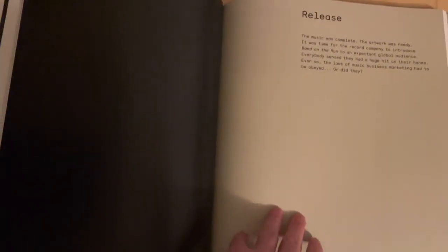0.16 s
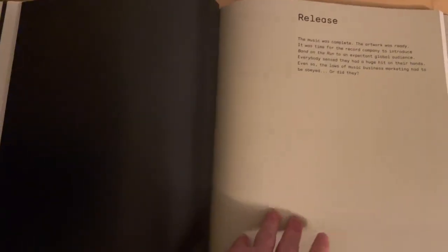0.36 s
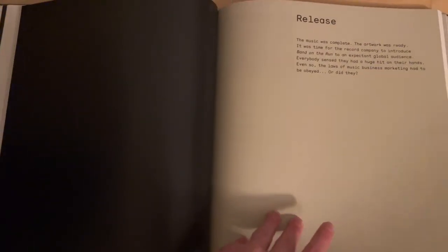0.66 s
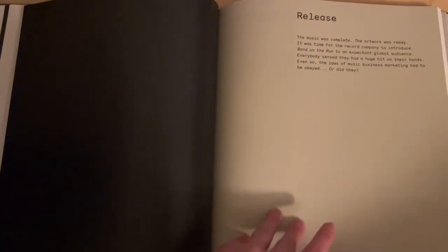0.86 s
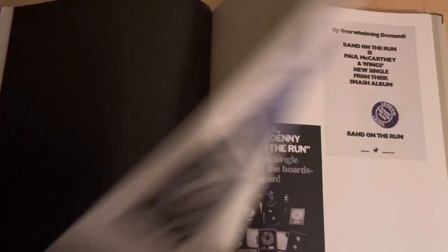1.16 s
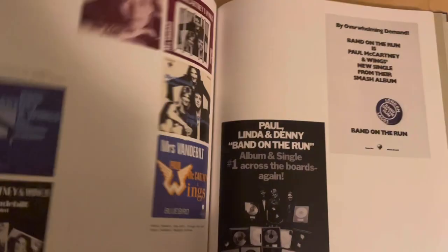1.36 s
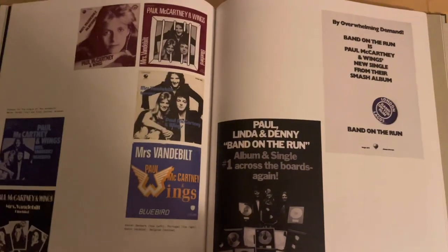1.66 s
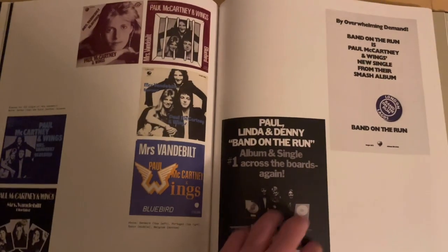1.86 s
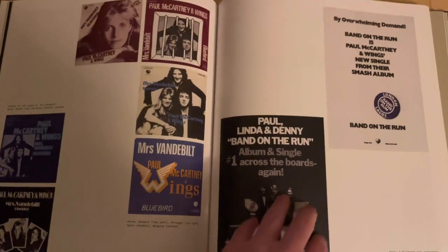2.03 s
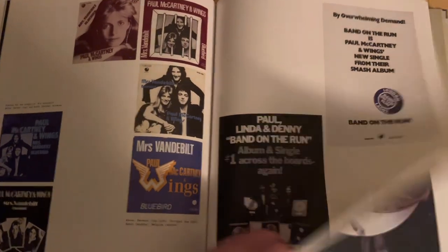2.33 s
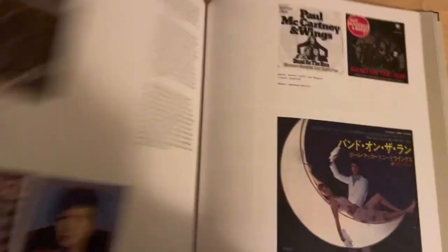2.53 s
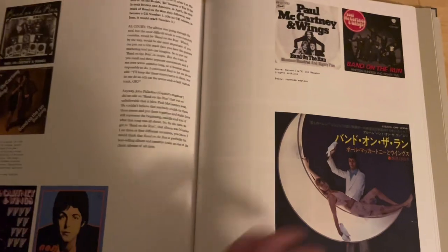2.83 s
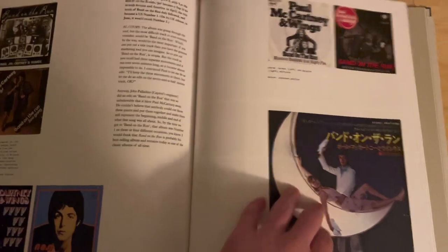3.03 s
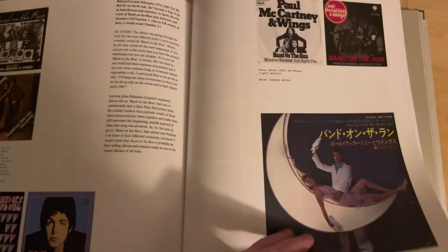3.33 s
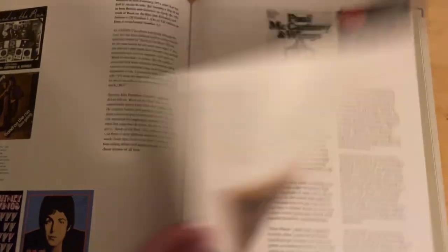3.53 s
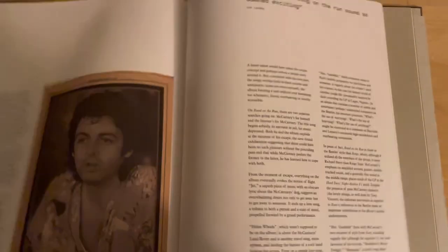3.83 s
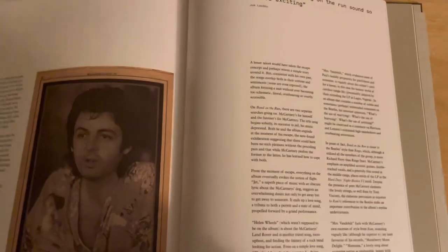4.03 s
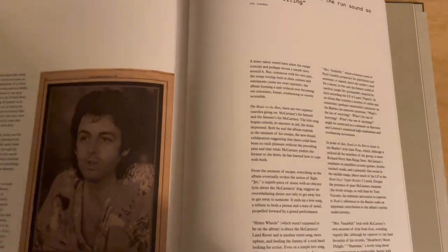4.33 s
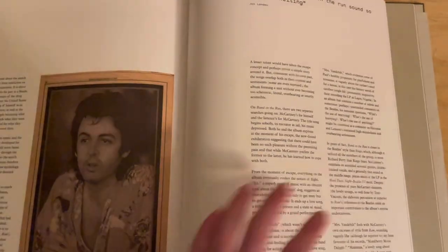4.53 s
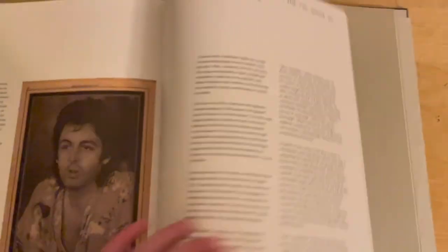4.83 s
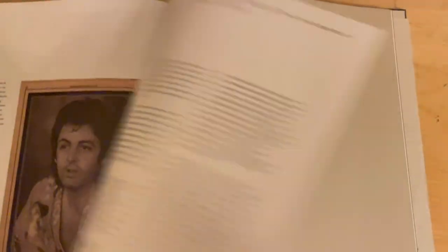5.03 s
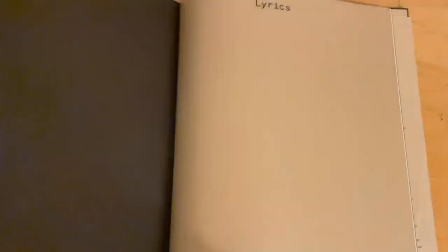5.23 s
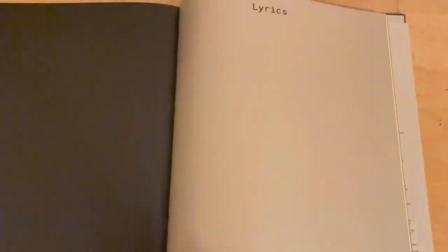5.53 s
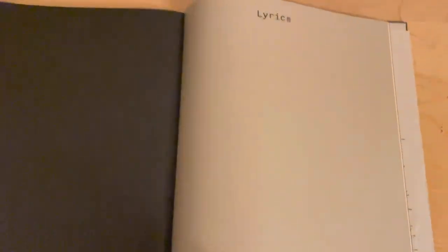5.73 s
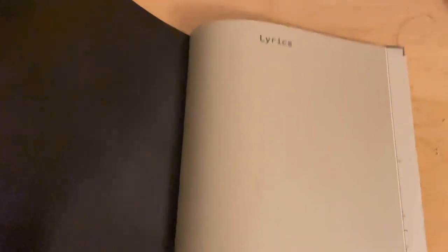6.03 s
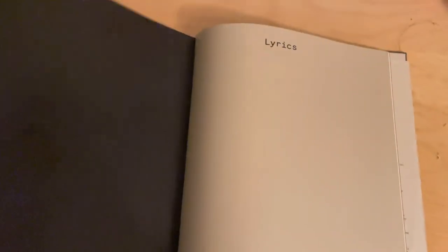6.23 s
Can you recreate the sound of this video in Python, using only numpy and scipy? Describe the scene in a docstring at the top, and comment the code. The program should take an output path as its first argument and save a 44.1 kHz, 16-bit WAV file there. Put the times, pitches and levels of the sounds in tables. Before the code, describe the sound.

Close up in a small quiet room, heavy pages of a big book are turned. Faint finger rubs lead to a light flick, then a rustling flap, a sharp paper pop and another flap. After more sliding, the hardest slap lands near the middle. A brisk dry swipe follows, then a softer, duller page landing and a last small cluster of flaps. The stereo pickup is near, with a very short room tail and faint hush.

```python
"""In a small, quiet room, the stiff pages of a large hardcover book are turned one after another, close by.
Fingers and sheets slide with a dry hiss of coloured, grainy noise; swinging sheets rustle and fan low puffs.
A lifted sheet buckles with a snap of decaying partials, its edge ticks in bright bursts of tiny contacts,
and it flaps down on the stack as a slap through the sheet's resonances, with a crisp crinkle on top.
Gaps of air sing under the sheets, dull thumps settle them, and a faint hush lies beneath."""
import sys
import numpy as np
from scipy import signal
from scipy.fft import rfft, irfft, next_fast_len
from scipy.io import wavfile
from scipy.ndimage import uniform_filter1d, map_coordinates

SR = 44100
rng = np.random.default_rng(int(sys.argv[2]) if len(sys.argv) > 2 else 0)


def output_pcm(signal):
    """Save a mono or channel-first signal as 16-bit PCM at the path in sys.argv[1].

    Samples are clipped to [-1, 1] before scaling.
    """
    pcm = np.clip(np.atleast_2d(signal).T, -1, 1) * 32767
    wavfile.write(sys.argv[1], SR, np.round(pcm).astype(np.int16))


N = 281358

# Event levels and shares are relative: each source trims them, and the stereo placement follows.
# a sheet flexes or lands: [t/s, level/dB, crisp share/dB, softness cut-off f/Hz, slap rise/s, slap t60/s]
FLAP_EVENTS = [(0.084, -53.5, -35, 1267, 0.0049, 0.033), (0.288, -48.5, -6.5, 1450, 0.0022, 0.081),
               (.494, -53.5, -29, 1270, 0.0023, 0.036), (0.588, -40.5, -44, 1040, 0.011, 0.049),
               (0.673, -43, -8, 900, 0.0017, 0.028), (.682, -30.5, -2.5, 1340, 0.00091, 0.025),
               (.718, -35.5, -11.5, 1210, 0.0015, 0.043), (1.4717, -32.5, -15, 1600, 0.002, 0.061),
               (1.4914, -19.5, -22, 1250, 0.0021, 0.019), (1.499, -25.5, -16, 2010, 0.0017, 0.045),
               (1.504, -21, -14, 2090, .0008, 0.028), (1.5112, -25, -21, 1590, 0.0007, 0.043),
               (1.521, -33, -25, 800, 0.0042, 0.054), (2.479, -35.5, -22, 1430, 0.0013, 0.02),
               (2.5141, -19, -7.5, 1130, 0.00065, 0.017), (2.528, -32, -25.5, 1030, 0.0043, 0.14),
               (2.559, -26, -23, 1030, 0.0097, 0.066), (2.577, -31, -9.5, 1303, 0.0042, 0.056),
               (2.59, -28, -28, 990, 0.0058, 0.051), (2.671, -40, -19.5, 1590, 0.0021, 0.096),
               (3.024, -50.5, -1, 1030, 0.0027, 0.046), (3.221, -35.5, -4, 1520, 0.0043, 0.047),
               (3.537, -39.5, -10, 1800, 0.0013, 0.031), (3.674, -22, -27, 1080, 0.0044, 0.028),
               (3.706, -42, -22, 1000, 0.0043, 0.045), (3.7925, -9.5, -12.5, 1170, 0.0018, 0.025),
               (3.803, -16, -8, 1360, 0.0059, 0.047), (3.812, -17.5, -15, 1310, 0.0022, 0.083),
               (3.829, -29, -12, 1090, 0.0031, 0.11), (3.864, -41, -8, 1500, 0.0013, 0.057),
               (4.273, -43, 0.5, 2020, 0.0031, 0.046), (5.061, -39.5, -3.5, 2375, 0.0042, 0.024),
               (5.195, -42.5, -9.5, 800, 0.0046, 0.042), (5.21, -34, -45, 450, 0.0044, 0.046),
               (5.236, -29, -44, 780, 0.0023, 0.035), (5.26, -19.5, -40, 800, 0.0044, 0.037),
               (5.268, -33.5, -12, 2200, .001, 0.023), (5.2705, -14.5, -36, 1292, 0.0022, 0.029),
               (5.283, -27, -31.5, 1280, 0.0048, 0.076), (5.3146, -16, -37, 1357, 0.0011, 0.019),
               (5.318, -25, -19, 2100, 0.001, .04), (5.329, -42, -22, 2097, 0.0027, 0.2),
               (5.423, -28.5, -33, 1050, 0.0012, 0.01), (5.433, -49.5, -22, 1680, 0.0031, 0.09),
               (5.8156, -35, -12.5, 1460, 0.0012, 0.031), (5.852, -40.5, -12, 1480, 0.0014, 0.031),
               (5.878, -37.5, -14, 1447, 0.0017, 0.028), (5.924, -35, -15, 1230, 0.002, 0.048),
               (6.04, -40, -19, 1400, 0.00096, 0.025), (6.053, -34, -20, 1700, 0.001, 0.021),
               (6.066, -31, -19, 1380, 0.00063, 0.021), (6.079, -32, -16, 1540, 0.004, 0.048),
               (6.113, -28, -16, 1620, 0.0031, 0.05), (6.119, -18.5, -18.5, 1560, 0.0029, 0.033),
               (6.141, -15, -15, 1760, 0.0013, 0.018), (6.155, -35, -23, 1500, 0.003, 0.076),
               (6.259, -41, -25, 1140, 0.0025, 0.029), (6.334, -40.5, -10, 1090, 0.0023, 0.019),
               (6.359, -25, -45, 1220, 0.0073, 0.044)]
# a page edge slips off a finger or another page: [t/s, level/dB, body share/dB]
TICK_EVENTS = [(0.6705, -41.5, 1.5), (0.6816, -33, -27), (0.7163, -33, -2), (0.849, -46, 6),
               (0.8773, -50, 11.5), (0.899, -39, 5), (1.1355, -37, 4), (1.4272, -42, -33),
               (1.485, -29.5, -8.5), (1.535, -37, -10.5), (1.627, -47.5, -12), (1.695, -38, 3.5),
               (1.71, -33.5, 3.5), (2.28, -37, -17), (2.5158, -34, 5), (2.749, -49, -8.5),
               (3.606, -47.5, -0.5), (3.654, -42, 0), (3.792, -28, 5.5), (4.169, -49.5, 6.5),
               (4.72, -47.5, -9), (4.819, -58, 6.5), (5.407, -59, -6), (6.357, -36.5, -5.5)]
# a sheet's weight settles on the stack: [t/s, level/dB]
THUMP_EVENTS = [(.748, -48.5), (1.513, -41.5), (1.716, -48.5), (2.485, -49), (2.516, -43), (2.56, -43.5),
                (3.676, -44), (3.795, -43.5), (3.824, -44.5), (5.208, -44.5), (5.272, -40.5),
                (5.319, -40.5), (5.428, -54.5), (5.935, -54), (6.15, -41)]
# a bent sheet pops through: [t/s, level/dB, pitch f/Hz, swell/s, t60/s, crack share/dB, left over right/dB]
BUCKLE_EVENTS = [(1.2026, -36.5, 1482, 0.0061, 0.02, -1.5, -0.5),
                 (2.1784, -13, 2257, 0.0019, 0.013, -6, 0.5), (3.2251, -27, 1795, 0.0015, 0.019, -21, -1)]
# air sings in the gap under a sheet, and one row (near 1.19 s) is the rising chirp of a bending sheet: [middle
# t/s, length/s, level/dB, start f/Hz, end f/Hz]
GAP_NOTES = [(0.602, .04, -52, 622, 440), (.695, .05, -51, 548, 474), (1.194, .03, -41, 713, 1054),
             (1.39, 0.088, -62.5, 329, 422), (1.647, .06, -57.5, 559, 449), (2.61, 0.17, -45.5, 541.8, 467),
             (2.713, 0.24, -59.5, 980, 1102), (3.549, .04, -56, 1002, 420),
             (3.682, 0.027, -39, 312.5, 225.8), (3.814, .058, -38.5, 397.6, 311),
             (4.282, 0.068, -54, 985, 787), (4.734, .045, -64, 721, 381), (4.936, .26, -65.5, 884, 585.5),
             (5.278, .04, -31, 669, 557.5)]
# a finger or sheet slides over paper:
# [start t/s, rise/s, hold/s, hiss level/dB, edge sizzle share/dB, hollow rustle share/dB]
SLIDE_STROKES = [(0, 0.0027, 0.041, -84, 3, 5.5), (0.275, 0.01, 0.0098, -80, -3, 6),
                 (0.661, 0.024, 0.043, -60.5, -13.5, -3), (0.874, 0.12, 0.0038, -61.5, -2.5, 1.5),
                 (1.016, 0.15, 0.056, -62, -7, 3.5), (1.25, 0.042, 0.36, -74.5, -0.5, 4),
                 (1.46, 0.0081, 0.017, -56, -0.5, 3), (1.512, 0.021, 0.049, -59.5, -3.5, -8),
                 (1.706, 0.014, 0.021, -57.5, -2, -8), (1.784, 0.043, 0.12, -67.5, -8.5, -4),
                 (2.037, 0.052, 0.23, -66, -6, -4), (2.326, 0.11, 0.032, -59.5, -9, -13),
                 (2.497, 0.018, 0.034, -53, -8, -0.5), (2.623, 0.12, 0.055, -59, -8, -10.5),
                 (2.985, 0.044, 0.012, -63.5, -6.5, -10), (3.053, 0.17, 0.024, -62.5, -4, -19),
                 (3.332, 0.068, 0.021, -59, -6, -10), (3.447, 0.092, 0.011, -57.5, -3.5, -5.5),
                 (3.566, 0.11, 0.05, -56.5, -3, -1), (3.817, 0.026, 0.017, -54.5, -6.5, -4),
                 (3.912, 0.052, 0.092, -65.5, -11.5, 0.5), (4.081, 0.088, 0.14, -67, -5.5, 0.5),
                 (4.346, 0.0273, 0.0084, -72.5, -6.5, -13.5), (4.583, 0.033, 0.027, -56, -1, -16.5),
                 (4.627, 0.04, 0.0074, -49, -0.5, -18), (4.678, 0.0095, 0.011, -59.5, -6, -16),
                 (4.802, 0.022, 0.03, -75, -11, 3), (4.88, 0.025, .06, -73.5, -18.5, 2),
                 (4.996, 0.058, 0.049, -69, -2.5, 5), (5.168, 0.11, 0.023, -73.5, 4.5, 1),
                 (5.803, 0.02, 0.054, -83.5, 3, 10), (6.07, 0.084, 0.055, -77.5, -15, 16),
                 (6.235, 0.19, .04, -64, -35, 2.5)]
# a sheet swings and fans air: [start t/s, rise/s, puff level/dB, hollow rustle level/dB]
SHEET_SWINGS = [(0.289, 0.013, -64.5, -85), (0.592, 0.015, -54, -72), (.67, 0.06, -53, -63),
                (.87, 0.032, -53.5, -71), (1.13, 0.15, -63, -77), (1.48, 0.03, -51, -54),
                (1.69, 0.037, -51.5, -56.5), (2.169, 0.016, -51.5, -44), (2.279, 0.021, -54, -90),
                (2.51, 0.07, -48.5, -47), (3.013, 0.022, -53, -66), (3.22, 0.017, -54.5, -54),
                (3.538, 0.02, -51, -62.5), (3.665, 0.04, -55, -52.5), (3.788, 0.022, -49, -39),
                (4.27, 0.065, -65.5, -74.5), (5.05, 0.025, -57.5, -77), (5.2, 0.115, -48, -59.5),
                (5.81, 0.057, -58.5, -68), (6.06, 0.099, -48, -51), (6.33, 0.049, -46, -76)]

# resonances of a sheet over the stack, before each bend varies them: [f/Hz, width/Hz, level/dB]
SHEET_MODES = [(331, 61, -3), (429.5, 12, 5.5), (526, 82, 8), (630, 190, 4.5), (776, 24, 0.5),
               (847, 38, -2.5), (980, 140, -1), (1390, 97, 0), (1650, 30, -13), (2600, 180, -13)]
# partials of a buckle's ring, before the crack tilts them: [multiple of its pitch, level/dB]
BUCKLE_PARTIALS = [(0.641, -11), (.75, -14.5), (0.928, -7), (1, -4.5), (1.183, -6), (1.36, -16), (2.14, -5),
                   (2.419, -16.5), (2.83, -11)]

# broad hiss of paper fibres: [f/Hz, level/dB]
HISS_SPECTRUM = [(200, -28), (700, -9), (1500, 1.5), (3000, 6.5), (5000, 3.5), (7000, -5.5), (10000, -17.5),
                 (16000, -41)]
# fine sizzle of a sliding page edge: [f/Hz, level/dB]
SIZZLE_SPECTRUM = [(3000, -28), (6000, -2.5), (9000, -2), (12000, -7.5), (14000, -18), (16000, -22)]
# contacts that set a swinging sheet rustling: [f/Hz, level/dB]
RUSTLE_SPECTRUM = [(120, -25.5), (300, -2.5), (550, -3.5), (1000, 2), (1600, -7), (3500, -40)]
# rustle of a sliding sheet damped by the stack: [f/Hz, level/dB]
DAMPED_SPECTRUM = [(120, -17.5), (300, -4), (550, 5.5), (1000, 3), (1600, -1), (2400, -9), (5000, -28)]
# low push of moved air: [f/Hz, level/dB]
AIR_SPECTRUM = [(20, -27.5), (45, -5), (65, -1.5), (95, -1), (135, 3.5), (190, -12.5), (350, -12.5),
                (900, -52.5)]
# sharp crinkling of a sheet's surface: [f/Hz, level/dB]
CRINKLE_SPECTRUM = [(300, -34.5), (1000, -5), (1550, 7.5), (2000, 7.5), (2450, 9.5), (3200, 2),
                    (6000, -6.5), (10000, -9.5), (16000, -23.5)]
# bright click of a page edge: [f/Hz, level/dB]
EDGE_SPECTRUM = [(300, -12), (1200, -1.5), (2500, 0.5), (5500, -5.5), (9000, -3.5), (13000, -23),
                 (16000, -17)]
# crack of a sheet flipping over: [f/Hz, level/dB]
CRACK_SPECTRUM = [(200, -16), (800, -1.5), (2200, 7), (3900, -3), (6000, -2.5), (7500, -0.5), (9500, -34),
                  (16000, -41.5)]
# steady hush of the room: [f/Hz, level/dB]
HUSH_SPECTRUM = [(20, -13), (55, 7), (130, -4), (250, -13.5), (600, -21), (2000, -31.5), (8000, -39),
                 (16000, -46.5)]

# how far left leads right in the direct sound: [f/Hz, phase/rad]
PORT_PHASE = [(0, -0.5), (950, 0.5), (2070, 0.39), (3100, 1.49), (4910, 0.58), (6370, -1.56), (6720, -2),
              (8100, -3.5), (9910, -5.5), (12300, -7.5), (13300, -11.5), (16000, -11.5)]
# decay of the room's tail: [f/Hz, t60/s]
ROOM_DECAY = [(100, 0.52), (500, 0.12), (2500, 0.36), (8000, 0.22), (16000, 0.21)]

TOP_HZ = 15900
SPAN = 16384  # samples in a single event or response
AGE = np.arange(SPAN) / SR  # seconds since its start
STROKE_FALL_DB_PER_S = 245  # a slide dies away as the paper comes to rest
STROKE_AIR_DB = -3  # air stirred by a slide, relative to its rustle
PUFF_FALL_DB_PER_S, RUSTLE_FALL_DB_PER_S = 172.5, 209  # after the swing
BEND_DELAY_S = 0.0007  # travel time of a 1 kHz bending wave across the sheet
FLUTTER_DB = 2  # a landing sheet crinkles in uneven clumps
CRACKLE_DB = 8  # scatter in size of the single contacts of a crinkle or tick
TICK_T60_S = 0.02
OVERTONE_GROWTH = 0.99  # dB per octave that the overtones gain for each dB of crack
THUMP_RISE_S, THUMP_T60_S = 0.007, 0.14
GAP_WIDTH = 0.17  # half-width of a gap's note over its start pitch


def amp(db):
    """Decibels to gain."""
    return 10 ** (np.asarray(db) / 20)


def unit(x):
    """Scaled to rms 1."""
    return x / np.sqrt(np.mean(x ** 2) + 1e-20)


def along(points, hz):
    """(Hz, value) points read on a log frequency axis."""
    f, v = np.transpose(points)
    return np.interp(np.log(hz + 1), np.log(f + 1), v)


def wobble(rate):
    """A smooth random curve, rate knots a second."""
    knots = rng.standard_normal(int(N * rate / SR) + 4)
    return map_coordinates(knots, [np.arange(N) * rate / SR])


def filtered(x, response):
    """x times a complex response of frequency."""
    size = next_fast_len(N + SPAN)
    hz = np.fft.rfftfreq(size, 1 / SR)
    return irfft(rfft(x, size) * response(hz), size)[..., :N]


def coloured(x, spectrum):
    """x shaped by a spectrum and scaled to rms 1."""
    return unit(filtered(x, lambda hz: amp(along(spectrum, hz))))


def noise(spectrum, grain_db, patchy_db):
    """Coloured noise of rms 1 that clumps into tiny catches (grain) and drifts in colour (patches)."""
    catches = rng.standard_normal(N) * amp(grain_db * wobble(rate=900))
    z = signal.stft(catches, nperseg=512)[2]
    # patches spread over 4 frequency bins and 14 time frames
    field = uniform_filter1d(rng.standard_normal(z.shape), size=4, axis=0)
    field = uniform_filter1d(field, size=14, axis=1)
    patchy = signal.istft(z * amp(patchy_db * unit(field)), nperseg=512)[1][:N]
    return coloured(patchy, spectrum)


def causal(spectrum):
    """The minimum-phase response of a spectrum, so that nothing sounds before a blow."""
    gain = amp(along(spectrum, np.fft.rfftfreq(SPAN, 1 / SR)))
    cepstrum = irfft(np.log(gain))
    return np.exp(rfft(2 * cepstrum[:SPAN // 2], SPAN) - cepstrum[0])


def sheet_response():
    """Summed resonances of a sheet, varied with every bend; its low bending waves arrive after the high."""
    f = np.fft.rfftfreq(SPAN, 1 / SR)
    travel = np.exp(-4j * np.pi * BEND_DELAY_S * np.sqrt(1000 * f))
    modes = np.array(SHEET_MODES)
    bend = rng.normal(0, [.01, 1], (len(modes), 2))  # spread of pitch (ratio) and level (dB)
    ringing = 0
    for (hz, width, db), (shift, swing_db) in zip(modes, bend):
        bent_hz = hz * (1 + shift)
        damping = 1j * f * width
        ringing = ringing + amp(db + swing_db) * damping / (bent_hz ** 2 - f * f + damping)
    return travel * ringing


def cushion(soft_hz):
    """A soft, wide contact shakes the sheet ever less above soft_hz."""
    lowpass = signal.butter(4, 1, analog=True)
    return signal.freqs(*lowpass, np.fft.rfftfreq(SPAN, 1 / SR) / soft_hz)[1]


def burst(response, rise, t60, first=0, clump_db=0, grain_db=0):
    """A run of tiny contacts that swells and dies through a response; first adds one strong early contact."""
    shape = (1 - np.exp(-(AGE / rise) ** 2)) * amp(-60 * AGE / max(t60, .004))
    shape = shape / shape.max()
    clumps = np.interp(AGE, np.arange(128) / 400, rng.standard_normal(128))
    # grain makes single contacts stand out
    sizes = amp(clump_db * clumps + grain_db * rng.standard_normal(SPAN))
    contacts = shape * sizes * rng.standard_normal(SPAN)
    contacts[np.argmax(shape) // 2] += first * np.linalg.norm(contacts)
    sound = irfft(rfft(contacts) * response)
    return sound * np.linalg.norm(shape) / np.linalg.norm(sound)


def add(track, s, sound):
    """Mixes a sound into the track from time s."""
    part = track[max(round(s * SR), 0):][:len(sound)]
    part += sound[:len(part)]


def gestures(rows, fall_db_per_s):
    """Joint envelope of (start s, rise s, hold s, dB) movements: each gathers speed, holds and dies away."""
    power, t = np.zeros(N), np.arange(SR) / SR
    for s, rise, hold, db in rows:
        speed = np.sin(np.pi / 2 * np.clip(t / rise, 0, 1))
        level_db = db - fall_db_per_s * np.maximum(t - rise - hold, 0)
        add(power, s, (speed * amp(level_db)) ** 2)
    return np.sqrt(power)


def stroke_rustle():
    """How hard the slides shake the sheet."""
    rows = [(s, rise, hold, db + share) for s, rise, hold, db, _, share in SLIDE_STROKES]
    return gestures(rows, STROKE_FALL_DB_PER_S)


def room(x, early_db, late_db):
    """Desk and book scatter the sound differently to each side; the walls add a short tail."""
    hz, t, z = signal.stft(rng.standard_normal((2, SPAN)), SR, nperseg=256)
    decay = amp(-60 * t / along(ROOM_DECAY, hz)[:, None])
    tail = signal.istft(z * decay, SR, nperseg=256)[1][:, :SPAN]
    tail = tail * (1 - np.exp(-AGE / 0.001))
    early = rng.standard_normal((2, SPAN)) * amp(-60 * AGE / 0.063) * (1 - np.exp(-AGE / 0.00044))
    early_gain = amp([[early_db + 0.5], [early_db]])  # mid, side
    answer = (early_gain * unit(early) + amp(late_db) * unit(tail)) / np.sqrt(SPAN)
    mid, side = signal.fftconvolve(x[None], answer, axes=1)[:, :N]
    # long waves reach both ports alike
    side = filtered(side, lambda f: 1j * f / (400 + 1j * f))
    left_right = np.array([mid + side, mid - side]) / np.sqrt(2)
    return filtered(left_right, lambda f: 1 / (1 + 1j * f / 7000))  # softened treble


def heard(x, left_db, early_db, late_db):
    """The direct sound reaches the two microphone ports slightly out of step; the room is added."""
    direct = filtered(x, lambda hz: np.exp(.5j * np.outer([1, -1], along(PORT_PHASE, hz))))
    balance = amp([[left_db / 2], [-left_db / 2]])
    return balance * (direct + room(x, early_db, late_db))


def room_tone():
    """A faint steady hush: one noise shared by both sides and one for each."""
    shape = lambda hz: amp(along(HUSH_SPECTRUM, hz))
    hush = unit(filtered(rng.standard_normal((3, N)), shape))
    return amp(-73.0) * hush[0] + amp(-74.0) * hush[1:]


def puffs():
    """Air fanned by the sheets reaches the microphones as a soft low push."""
    swing = gestures([(s, rise, 0, db) for s, rise, db, _ in SHEET_SWINGS], PUFF_FALL_DB_PER_S)
    push = np.hypot(swing, amp(STROKE_AIR_DB) * stroke_rustle())
    return push * noise(AIR_SPECTRUM, grain_db=3.5, patchy_db=2.5)


def gaps():
    """The wedge of air under a sheet is a cavity whose narrow, airy note glides as the sheet moves; a bending
    sheet's rising chirp is made the same way."""
    track = np.zeros(N)
    for s, length, db, start_hz, end_hz in GAP_NOTES:
        travel = np.clip(AGE / length, 0, 1)
        hz = start_hz * (end_hz / start_hz) ** travel
        # slow noise on two quadrature carriers makes a narrow band around the gliding pitch
        lowpass = signal.butter(2, GAP_WIDTH * start_hz, fs=SR)
        a, b = signal.lfilter(*lowpass, rng.standard_normal((2, SPAN)))
        phase = 2 * np.pi * np.cumsum(hz) / SR
        note = np.sin(np.pi * travel) ** 2 * (a * np.cos(phase) + b * np.sin(phase))
        add(track, s - length / 2, amp(db - 3.0) * unit(note) * np.sqrt(length / AGE[-1]))
    return track


def thumps():
    """The weight of a sheet settles on the stack with a short, dull push."""
    track, air = np.zeros(N), causal(AIR_SPECTRUM)
    for s, db in THUMP_EVENTS:
        add(track, s, amp(db) * burst(air, rise=THUMP_RISE_S, t60=THUMP_T60_S, first=0.6))
    return track


def swinging():
    """A swinging sheet rustles through its own resonances; a sliding one is damped by the stack, so dry."""
    swing = gestures([(s, rise, 0, db) for s, rise, _, db in SHEET_SWINGS], RUSTLE_FALL_DB_PER_S)
    contacts = noise(RUSTLE_SPECTRUM, grain_db=7, patchy_db=2)
    ringing = unit(signal.fftconvolve(contacts, irfft(sheet_response()))[:N])
    hollow = swing * (amp(-5.5) * contacts + amp(-0.5) * ringing)
    damped = stroke_rustle() * noise(DAMPED_SPECTRUM, grain_db=6.5, patchy_db=1.5)
    return hollow + amp(-2.5) * damped


def sliding():
    """Paper fibres catch and let go: a broad hiss with stray crackles, and a finer sizzle from the edge."""
    rub = gestures([row[:4] for row in SLIDE_STROKES], STROKE_FALL_DB_PER_S)
    edge_rows = [(s, rise, hold, db + share) for s, rise, hold, db, share, _ in SLIDE_STROKES]
    edge = gestures(edge_rows, STROKE_FALL_DB_PER_S)
    pressure = amp(1.9 * wobble(rate=55))
    # about 90 times a second a fibre snags harder and tears free, audible while a slide lasts
    snags = (rng.random(N) < 90 / SR) * rng.standard_normal(N)
    crackle = coloured(snags, EDGE_SPECTRUM)
    hiss = noise(HISS_SPECTRUM, grain_db=3.4, patchy_db=2.6) + amp(-6) * crackle
    sizzle = noise(SIZZLE_SPECTRUM, grain_db=3, patchy_db=3.5)
    return pressure * (rub * hiss + amp(2) * edge * sizzle)


def ticks():
    """A released edge clicks brightly and shakes its sheet a little."""
    track, edge = np.zeros(N), causal(EDGE_SPECTRUM)
    for s, db, body_db in TICK_EVENTS:
        click = amp(-8.0) * burst(edge, rise=0.0019, t60=TICK_T60_S, grain_db=CRACKLE_DB)
        body = amp(body_db - 9.5) * burst(sheet_response(), rise=0.0011, t60=.025, first=0.52)
        add(track, s, amp(db) * (click + body))
    return track


def buckle(s, db, hz, swell, t60, crack_db):
    """The bend swells into a short ring and cracks as it flips; a harder crack brings out the overtones."""
    track, t = np.zeros(N), AGE - AGE[SPAN // 2]  # t = 0 at the flip
    shape = np.exp(np.minimum(t, 0) / swell) * amp(-60 * np.maximum(t, 0) / t60)
    tilt_db = OVERTONE_GROWTH * crack_db  # per octave above the pitch
    ring = 0
    for multiple, level in BUCKLE_PARTIALS:
        gain = amp(level + tilt_db * max(np.log2(multiple), 0))
        ring = ring + gain * np.sin(2 * np.pi * (hz * multiple * t + rng.random()))
    add(track, s + t[0], amp(db) * shape * ring)
    add(track, s, amp(db + crack_db) * burst(causal(CRACK_SPECTRUM), rise=0.00015, t60=t60))
    return track


def flaps():
    """A soft slap rings the sheet and crinkles its surface in tiny sharp cracks."""
    track, crisp = np.zeros(N), causal(CRINKLE_SPECTRUM)
    for s, db, crisp_db, soft_hz, rise, t60 in FLAP_EVENTS:
        struck = sheet_response() * cushion(soft_hz)
        slap = amp(-11.0) * burst(struck, rise=rise, t60=t60, first=0.45)
        crinkle = burst(crisp, rise=0.8 * rise, t60=1.2 * t60, clump_db=FLUTTER_DB, grain_db=CRACKLE_DB)
        add(track, s, amp(db) * (slap + amp(crisp_db - 12.5) * crinkle))
    return track


def scene():
    """All the paper sounds in the quiet room."""
    return (room_tone()
            + heard(puffs() + thumps(), left_db=0.8, early_db=-5.0, late_db=-13.0)
            + heard(swinging() + gaps(), left_db=1.5, early_db=-11.5, late_db=-6.0)
            + heard(sliding(), left_db=0.0, early_db=-2.5, late_db=-13.5)
            + heard(ticks(), left_db=0.5, early_db=-4.0, late_db=-10.5)
            + sum(heard(buckle(*pop), left_db=pan_db, early_db=-7.0, late_db=-13.5)
                  for *pop, pan_db in BUCKLE_EVENTS)
            + heard(flaps(), left_db=3.0, early_db=-7.5, late_db=-11.5))


def record(dry):
    """A steep band limit: nothing passes above TOP_HZ."""
    return filtered(dry, lambda hz: hz < TOP_HZ)


dry = scene()
out = record(dry)
output_pcm(out)
```